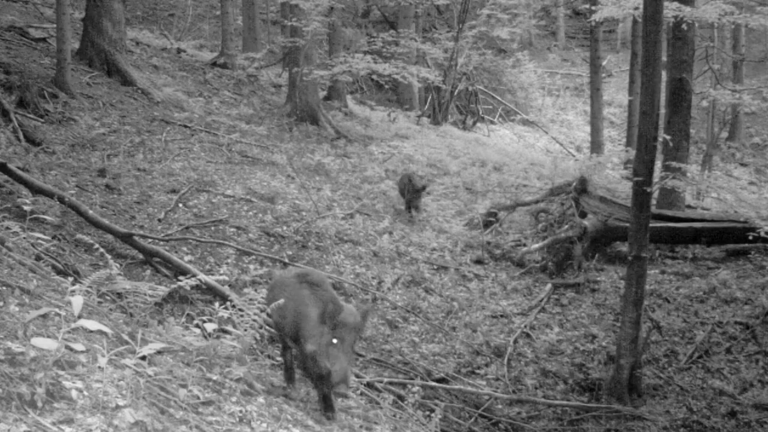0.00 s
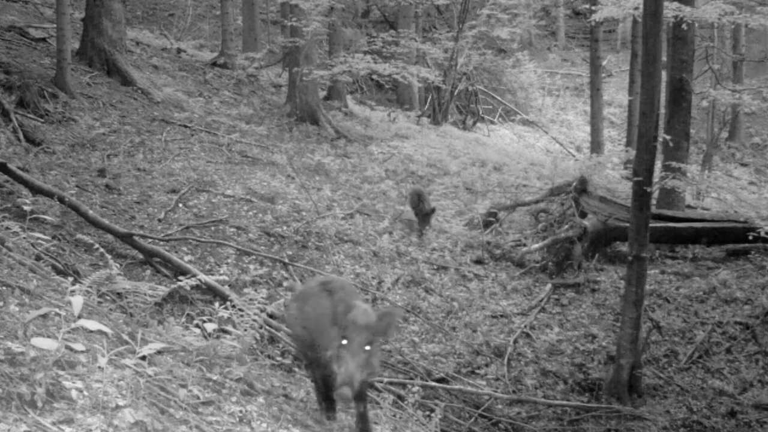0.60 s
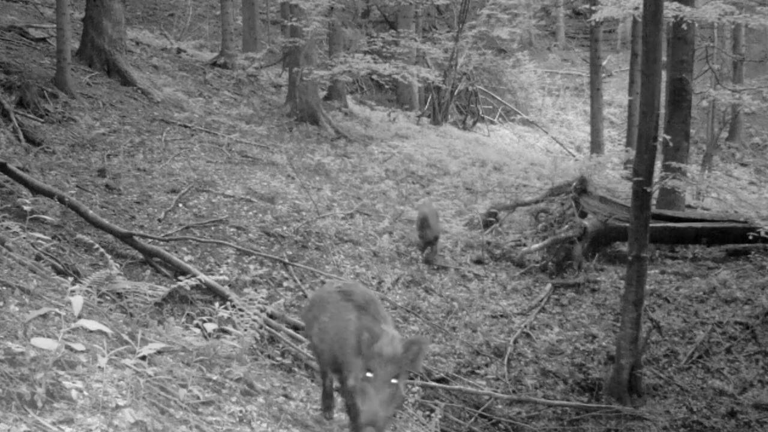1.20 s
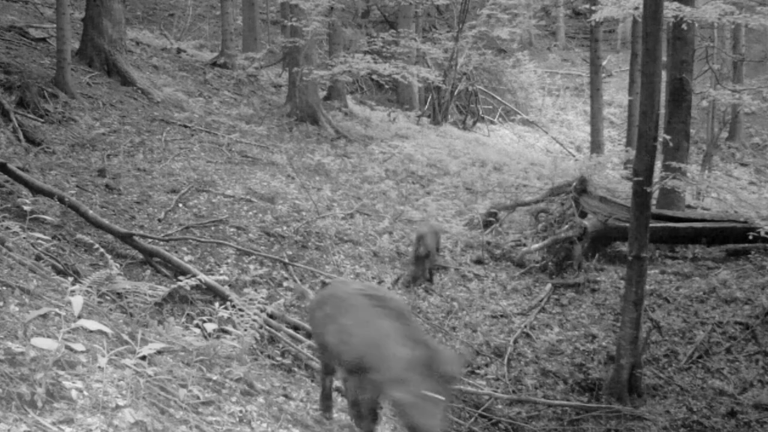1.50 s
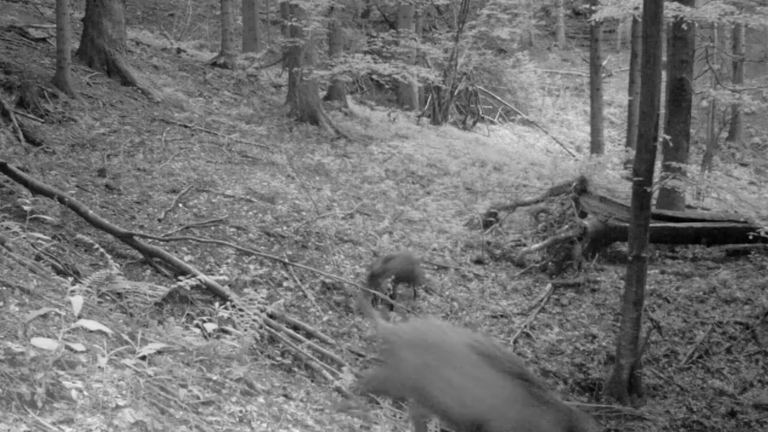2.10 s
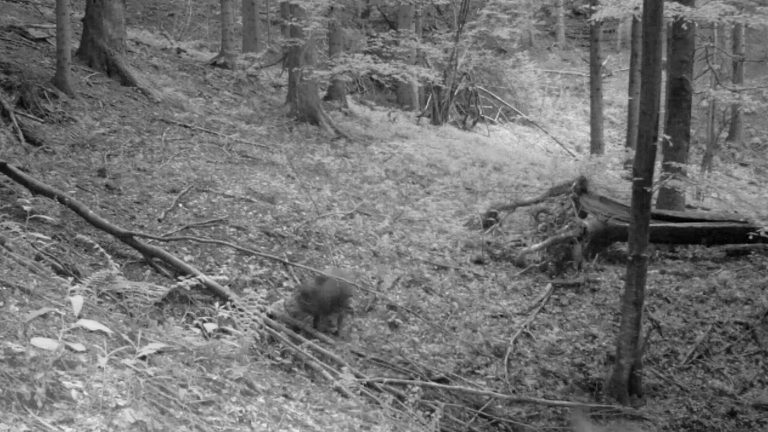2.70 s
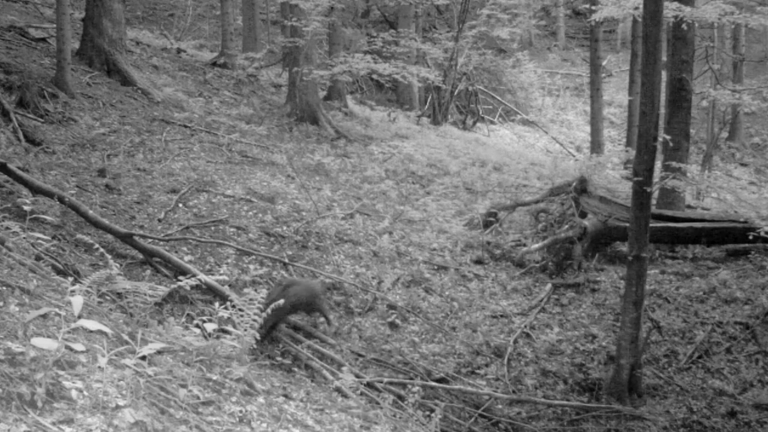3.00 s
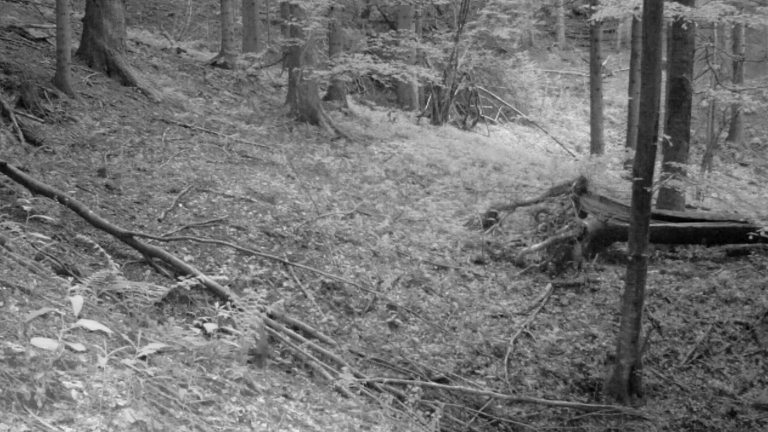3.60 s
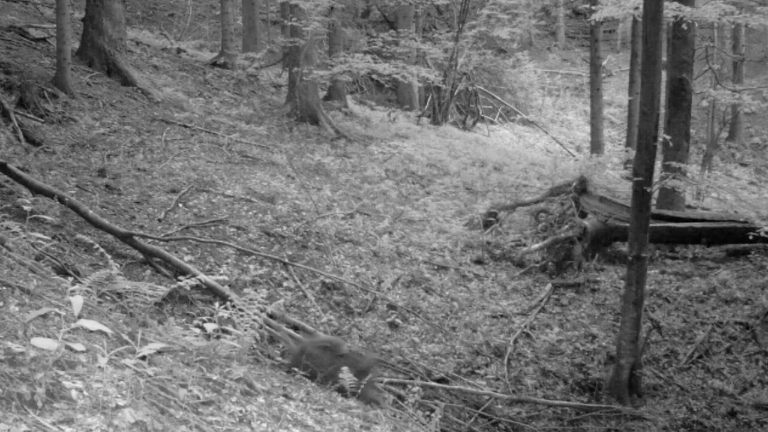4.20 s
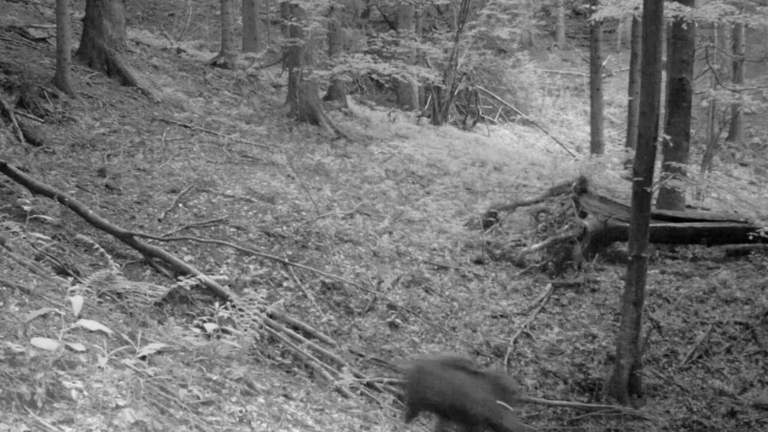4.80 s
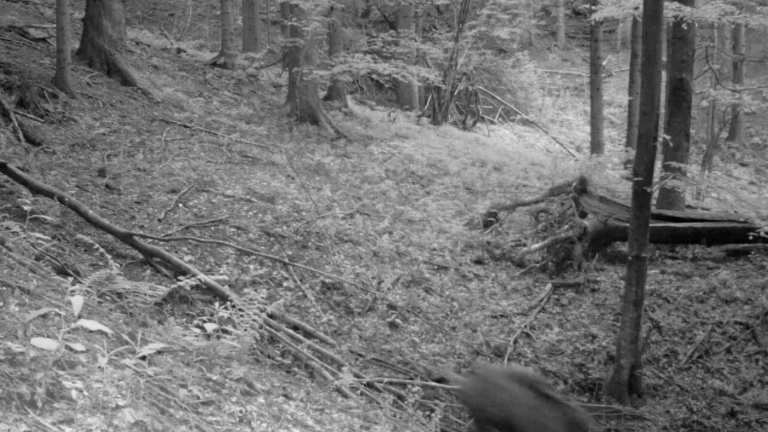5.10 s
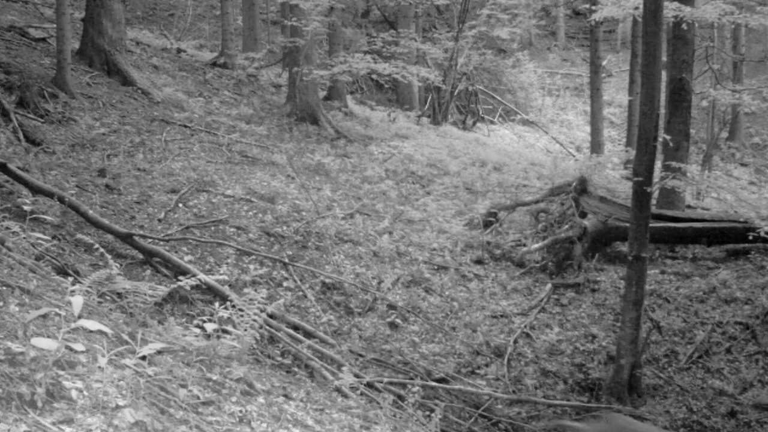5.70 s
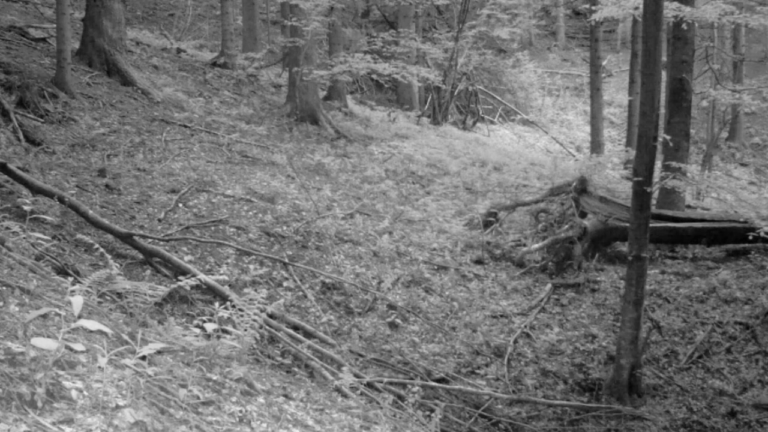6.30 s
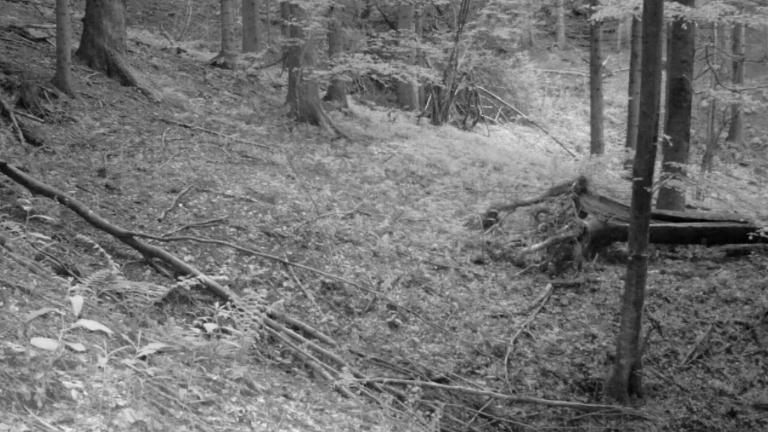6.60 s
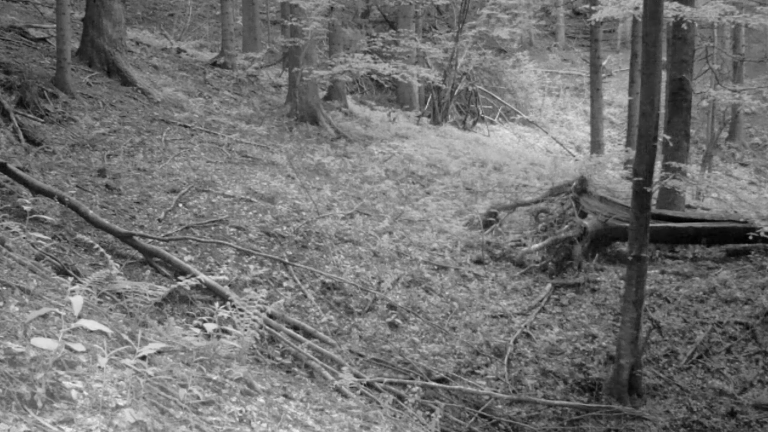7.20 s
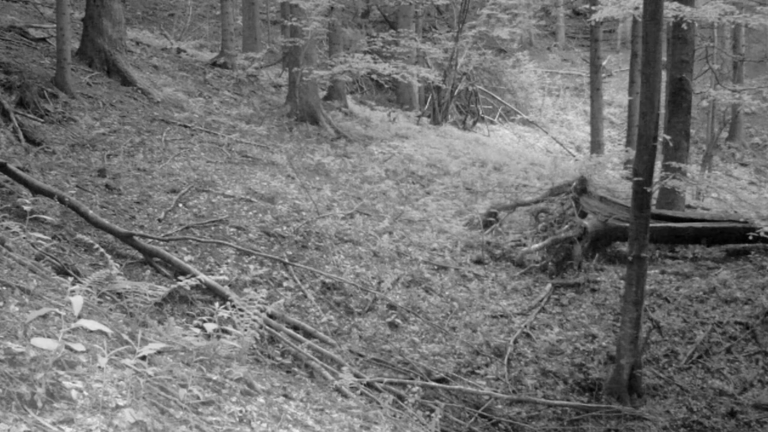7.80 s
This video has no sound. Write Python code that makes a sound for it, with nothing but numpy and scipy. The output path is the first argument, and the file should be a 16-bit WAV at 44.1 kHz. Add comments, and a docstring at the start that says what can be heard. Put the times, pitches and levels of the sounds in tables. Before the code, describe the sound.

Two wild boar walk down a forest slope past a nearby microphone. Their hooves rustle and crunch unevenly through dry leaves, with sharp twig snaps and soft thuds on the soil. Faint birds whistle in the first two seconds, and a brief, soft grunt comes early. The rustling grows louder in the middle, with a short snuffle and one sharper crack, then eases and carries on. A low rumble and faint hum lie underneath.

```python
"""Dry leaves rustle, softly at first, as two wild boar stroll down a forest slope, one after the other.
Each hoof breaks leaves in a shower of tiny fractures; twigs snap and the soil thuds under the load.
The animals grunt softly (pulses exciting a resonance) and snuffle (turbulent breath).
Far off, birds whistle over a low drone. All is heard in mono through the resonant plastic case
of a trail camera beside their path."""
import sys
import numpy as np
from scipy import signal
from scipy.fft import rfft, irfft
from scipy.io import wavfile
from scipy.ndimage import uniform_filter1d, map_coordinates

SR = 44100
rng = np.random.default_rng(int(sys.argv[2]) if len(sys.argv) > 2 else 0)


def int16_out(signal):
    """Quantize to a 16-bit WAV file."""
    q = np.round(np.clip(np.atleast_2d(signal).T, -1, 1) * 32767)
    wavfile.write(sys.argv[1], SR, q.astype(np.int16))


N = 351036
TIME = np.arange(N) / SR

# steady forest rumble and microphone hiss: (frequency [Hz], relative density [dB])
FLOOR_SPECTRUM = [(22, 12), (50, -4.5), (90, -2), (140, -10.5), (220, -18), (410, -25), (900, -27),
                  (1600, -34.5), (2700, -32.5), (4300, -29.5), (7000, -49), (14000, -38), (16000, -46)]
# swelling of the distant drone: (time [s], relative level [dB])
DRONE_CONTOUR = [(0, -44.5), (.5, -36), (1.1, -35.5), (1.9, -43), (2.9, -52), (4.6, -46), (5.3, -39),
                 (5.9, -40), (7.5, -42.5), (7.96, -48)]
# bird whistles: (start [s], end [s], first frequency [Hz], last frequency [Hz], level [dB])
WHISTLES = [(0.02, 0.12, 3500, 3380, -54), (0.47, 0.66, 4200, 4300, -64), (0.69, 0.78, 5650, 5520, -60),
            (0.76, 0.93, 2850, 2720, -56), (0.93, 1.0, 3050, 2900, -57), (1.14, 1.33, 4350, 4250, -62),
            (1.335, 1.385, 2280, 2510, -54), (1.37, 1.52, 2510, 2480, -54.5), (1.5, 1.565, 2460, 2360, -54),
            (1.555, 1.76, 2490, 2450, -57.5), (1.97, 2.12, 3250, 3250, -59), (2.14, 2.21, 2470, 2180, -57)]
# early reflection off trunks, shifting as the animals move: (time [s], delay [ms], gain [ratio])
TRUNK_ECHO = [(0, 0.66, 0.23), (.6, 0.62, 0.086), (1.0, 0.42, 0.078), (2.4, 0.38, 0.12), (3.2, .55, 0.056),
              (3.9, 0.82, 0.048), (4.7, .72, 0.061), (5.3, 0.56, 0.04), (6.5, 0.526, 0.15),
              (7.96, 0.19, 0.067)]
# modes of the plastic case: (frequency [Hz], bandwidth [Hz], gain [dB])
CASE_MODES = [(1480, 450, 2), (1980, 220, -2), (2420, 220, 3.5), (2850, 260, -1), (3300, 250, 1.5),
              (4300, 250, 1), (5300, 200, 1.5), (5580, 160, 1.5), (6100, 200, 2), (7240, 300, 2),
              (8170, 150, 3.5), (9150, 150, 1.5), (10200, 200, 1.5), (11900, 220, 2), (13500, 500, 1.5),
              (14250, 400, 2.5)]

# grunts of the leading boar, breaths, soil yielding: (centre time [s], level [dB], width [s])
GRUNT_SWELLS = [(0.812, -43.5, 0.02), (0.92, -43.5, 0.044), (1.015, -45, 0.023)]
BREATH_SWELLS = [(3.06, -39.5, 0.054)]
THUD_SWELLS = [(0.96, -36.5, 0.13), (1.59, -40, .06), (2.65, -33, 0.052), (2.99, -35, 0.053),
               (3.38, -39, 0.24), (3.60, -41, 0.062), (3.92, -37, 0.04), (4.36, -39.5, 0.1),
               (5.66, -33, 0.042)]
# breath, thuds, soil rumble, damp leaves, dry leaves, leaf edges: (frequency [Hz], relative density [dB])
BREATH_SPECTRUM = [(100, 8), (300, 5), (750, 1), (1200, -5), (1800, -25), (2600, -13), (5000, -11)]
THUD_SPECTRUM = [(25, 10), (60, 1.5), (120, 1), (200, -10), (300, -24.5), (600, -69)]
SOIL_SPECTRUM = [(32, 6), (60, 3), (110, -5), (170, -4.5), (280, -6), (450, -15.5), (800, -20.5),
                 (1600, -55)]
DAMP_SPECTRUM = [(300, -4.5), (600, -3.5), (950, -2), (1400, 1.5), (2000, -2), (3000, -3.5), (5000, -10.5),
                 (9000, -60)]
DRY_SPECTRUM = [(1500, -43), (3000, -7.5), (4200, -3), (5600, 1), (7500, 1.5), (9500, -10.5), (12000, -40),
                (16000, -36)]
EDGE_SPECTRUM = [(5000, -58), (8000, -4.5), (10000, 6.5), (12000, 5), (13200, 4.5), (14400, 8), (15500, -3)]
# hooves striking soil, roots and branches: (time [s], relative peak [dB], frequency [Hz])
HOOF_IMPACTS = [(1.019, -32.5, 900), (1.359, -31, 860), (1.57, -27, 570), (2.531, -31.5, 395),
                (2.628, -28, 162), (2.978, -24, 137), (3.613, -33, 296), (3.73, -33, 280),
                (3.893, -27.5, 450), (3.929, -23.5, 292), (4.359, -36, 330), (5.629, -25.5, 198),
                (6.064, -26, 644), (6.276, -33, 497), (6.873, -31, 314)]
# twigs breaking: (time [s], relative crack [dB], relative knock [dB], frequency [Hz], tear T60 [s])
TWIG_BREAKS = [(0.1292, -39.5, -41.5, 5720, .008), (0.226, -29, -39.5, 6860, .009),
               (0.2507, -33, -46, 4480, .005), (0.3108, -36.5, -38, 5650, .009),
               (0.8731, -34.5, -39.5, 5100, 0.0088), (1.0833, -27.5, -38, 5300, 0.0054),
               (1.448, -30.5, -35.5, 7860, .005), (1.4666, -22, -36, 5500, .0062),
               (1.5725, -28.5, -34.5, 4770, 0.011), (1.7945, -30.5, -31.5, 5800, 0.0085),
               (2.1192, -25.5, -31.5, 5900, .005), (2.229, -31.5, -41, 5500, .003),
               (2.2796, -27.5, -37, 5300, 0.02), (2.4672, -24.5, -31.5, 6400, 0.01),
               (2.507, -23, -48, 7240, 0.011), (2.5879, -23, -41, 5900, 0.0082),
               (2.6033, -27, -42, 6010, 0.015), (2.6537, -23.5, -40, 5760, .008),
               (2.68, -24.5, -34, 6680, .008), (2.7745, -27, -47, 6100, .003),
               (3.1177, -35, -52, 6010, .006), (3.1266, -29, -32.5, 5670, 0.004),
               (3.1814, -15.5, -26, 6540, .028), (3.199, -21.5, -44, 6050, 0.0087),
               (3.5875, -30, -44, 5360, 0.0063), (3.5943, -37, -29.5, 7270, .016),
               (3.8476, -29, -40, 5340, .004), (3.8934, -22, -38, 4300, 0.0072),
               (4.3542, -29.5, -47, 3520, .012), (4.3587, -27.5, -44, 6500, .008),
               (4.5288, -54, -35, 5090, .012), (4.601, -33.5, -39, 5720, .005),
               (4.6426, -28.5, -34, 10200, 0.013), (4.7946, -30, -43, 3100, 0.0058),
               (4.8173, -37, -50, 6400, .003), (5.3343, -37, -45, 4140, .004),
               (5.0074, -29, -37, 7400, .017), (5.3623, -33.5, -47.5, 6470, .02),
               (5.432, -34, -37, 5400, .012), (5.436, -23.5, -32.5, 5400, .008),
               (5.5098, -36, -49, 4420, .013), (5.5507, -37, -48, 5110, .012),
               (5.578, -40.5, -37, 4120, .007), (5.678, -35, -47, 10500, .011),
               (5.9162, -38, -31, 3360, .008), (6.0654, -39, -33.5, 3040, .02),
               (6.1873, -38, -47, 6470, .008), (6.2136, -30, -50, 6940, .014),
               (6.6236, -26, -52, 7800, .006), (6.65, -29, -52, 6610, .004), (6.83, -30, -39, 6600, 0.0075),
               (6.8855, -29.5, -52, 5280, .016), (6.9057, -34, -57, 5550, .003),
               (6.9208, -27.5, -36, 3370, 0.0037), (7.1426, -36, -49, 8950, 0.014),
               (7.187, -29, -31, 2580, 0.0092), (7.256, -40, -50, 3200, 0.0056),
               (7.4447, -36.5, -44, 6470, 0.0088)]
# steps, in relative levels and tilts: (time [s], press duration [s], damp leaves [dB], dry leaves [dB],
# brittle edges [dB], soil [dB], dry tilt [dB/octave], edge tilt [dB/octave])
FOOTFALLS = [(0.116, 0.049, -53, -45.5, -56.0, -65, -5, 0.0),
             (0.212, 0.082, -47.5, -44.5, -51, -54, 2, 0.0), (0.467, 0.031, -60, -47, -57, -48, -8, -1.0),
             (0.786, 0.17, -51.5, -45, -54.5, -51, 1.0, -9),
             (1.049, 0.046, -51.5, -38.5, -49, -49, 0.0, -3.0), (1.405, 0.096, -47, -40, -49, -49, 0, -4.0),
             (1.547, 0.046, -51.5, -44, -48, -44, 1, -2.0), (1.677, 0.12, -47, -40.5, -47, -67, 3, 0.0),
             (1.971, 0.16, -47.5, -40, -48.5, -55, -2, -4.0),
             (2.192, 0.098, -48, -37, -45.5, -60, -3.5, -6), (2.339, 0.053, -47, -38.5, -47, -53, -2.5, -8),
             (2.459, 0.14, -43, -32.5, -43, -60, -1, -5), (2.63, 0.05, -42.5, -35, -42.5, -58, -1, -7.0),
             (2.76, 0.079, -43.5, -32.5, -43.5, -58, -0.5, -5),
             (2.948, 0.041, -47.5, -39, -49.5, -57, -8, 0.0), (3.023, 0.06, -41, -40, -61, -41.5, -6, 1.0),
             (3.178, 0.2, -43.5, -35, -41.5, -47.5, 5.5, -3.0),
             (3.523, 0.17, -43.0, -36.5, -40.5, -45.5, 3, -2),
             (3.784, 0.096, -40.5, -35, -37.5, -44.5, 1.0, 1),
             (4.035, 0.097, -43.5, -38.5, -41, -50, 0.0, 9.0),
             (4.323, 0.1, -45.5, -37.5, -43, -46, -6, 5.0), (4.608, 0.061, -45.5, -36, -45, -52, -2, 3),
             (4.92, 0.039, -51.0, -42.5, -49, -45, -4, 1.0), (4.991, 0.024, -43.5, -39, -43, -58, 0.0, -3),
             (5.237, 0.059, -49.5, -46.5, -51, -56, 1, 2.0), (5.335, 0.14, -47.5, -47.5, -47, -56, 3, 0.0),
             (5.559, 0.053, -53, -53, -51, -43, 1, 3.0), (5.654, 0.021, -55.5, -45, -53, -56, 0.0, -3.0),
             (5.808, 0.1, -45, -35, -42.5, -48.5, -0.5, -8), (6.043, 0.02, -43.5, -39.5, -46, -46, 3, 8),
             (6.173, 0.082, -46.5, -33.5, -39.5, -48, -3, 0), (6.252, 0.15, -43.5, -31.5, -39, -49, -1, -1),
             (6.517, 0.063, -42.5, -35, -42, -61, 4, 6.0), (6.566, 0.13, -53, -34.5, -41, -62, -5, -4),
             (6.801, 0.094, -48, -39.5, -46, -51.5, -5, 4.0),
             (7.121, 0.059, -51, -45, -50.0, -49.5, -7, 6.0),
             (7.349, 0.094, -49.5, -40.5, -46, -48, -2.5, -2),
             (7.631, 0.085, -48, -38, -43.5, -64, -0.5, 1.0),
             (7.902, 0.021, -68, -50.5, -47.0, -60.0, 4, 0.0)]
# legs and snouts stirring the leaves between steps: (time [s], relative level [dB])
STIR_CONTOUR = [(0, -53), (.7, -54.5), (1.3, -49), (2.2, -51.5), (3.3, -43.5), (4.2, -44), (5.1, -50),
                (5.75, -50), (6.5, -52), (7.05, -50.5), (7.96, -52.5)]
# response of damp leaves, dry leaves, edges and soil to stirring: (relative level [dB], slope [dB/dB])
STIR_RESPONSE = [(-52.5, 0.57), (-44.5, 1.0), (-51.5, 0.91), (-51.5, 0.63)]


def from_db(db):
    """Amplitude ratio: a factor of ten for every 20 dB."""
    return 10 ** (np.asarray(db) / 20)


def unit_rms(x):
    """Normalisation to unit mean power."""
    return x / np.sqrt(np.mean(x ** 2) + 1e-20)


def in_time(rows):
    """Linear interpolation of each column to every sample."""
    times, *columns = np.transpose(rows)
    return [np.interp(TIME, times, column) for column in columns]


def at_hz(spectrum, hz):
    """Interpolation of a spectrum on a logarithmic frequency axis."""
    frequencies, db = np.transpose(spectrum)
    return np.interp(np.log(hz), np.log(frequencies), db)


def band(x, low_hz, high_hz):
    """Causal Butterworth band-pass filtering."""
    sos = signal.butter(2, [low_hz, min(high_hz, .48 * SR)], "band", fs=SR, output="sos")
    return signal.sosfilt(sos, x + 1e-18)


def resonate(x, hz, width_hz):
    """Forced response of a damped oscillator with unit peak gain."""
    radius = np.exp(-np.pi * width_hz / SR)
    feedback = [1, -2 * radius * np.cos(2 * np.pi * hz / SR), radius ** 2]
    return signal.lfilter(np.array([1, 0, -1]) * (1 - radius ** 2) / 2, feedback, x)


def drift(per_s):
    """Smooth random modulation of unit rms, interpolated through per_s values a second."""
    knots = rng.standard_normal(2 ** 14)
    return unit_rms(map_coordinates(knots, [TIME * per_s], order=2, mode="wrap"))


def noise(spectrum):
    """Spectral shaping of white noise, to unit rms."""
    hz = np.maximum(np.fft.rfftfreq(N, 1 / SR), 1)
    roll_off = np.minimum(hz / spectrum[0][0], 1) ** 2 * np.minimum(spectrum[-1][0] / hz, 1) ** 2
    return unit_rms(irfft(rfft(rng.standard_normal(N)) * from_db(at_hz(spectrum, hz)) * roll_off, N))


def swells(rows):
    """A sum of Gaussian amplitude envelopes."""
    return sum(from_db(db) * np.exp(-2 * ((TIME - centre) / width) ** 2) for centre, db, width in rows)


def add(out, start_s, sound):
    """Linear superposition of a sound at a given time."""
    i = min(max(round(start_s * SR), 0), N)
    out[i:i + len(sound)] += sound[:N - i]


def noise_floor(level_db):
    """Stationary broadband noise: forest rumble and microphone hiss."""
    return from_db(level_db) * noise(FLOOR_SPECTRUM)


def drone(hz, sag_hz_per_s, waver_hz, flutter_db):
    """Two harmonics share one slowly sinking, wavering pitch; the octave swells less than the first."""
    contour_db, = in_time(DRONE_CONTOUR)
    octave_db = -45.5 + .3 * (contour_db + 37)
    phase = 2 * np.pi * np.cumsum(hz - sag_hz_per_s * TIME + waver_hz * drift(14)) / SR
    fundamental = from_db(contour_db + 2.5 + flutter_db * drift(24)) * np.sin(phase)
    return fundamental + from_db(octave_db + flutter_db * drift(24)) * np.sin(2 * phase)


def birds(quaver):
    """Frequency modulation: each whistle is a gliding pure tone with a slight random quaver."""
    out, wobble = np.zeros(N), 1 + quaver * drift(90)
    for start, end, first_hz, last_hz, db in WHISTLES:
        i, n = round(start * SR), round((end - start) * SR)
        hz = np.linspace(first_hz, last_hz, n) * wobble[i:i + n]
        tone = np.sin(2 * np.pi * np.cumsum(hz) / SR)
        add(out, start, from_db(db) * signal.windows.tukey(n, .4) * tone)
    return out


def reverberation(x, t60, high_hz):
    """Scattering by trunks and ground leaves a thin, dull tail that decays exponentially."""
    t = TIME[:SR]
    echoes = rng.standard_normal(SR) * (rng.random(SR) < .1) * from_db(-60 * t / t60) * (t > .003)
    echoes = band(echoes, 300, high_hz)
    return signal.fftconvolve(x, echoes / np.linalg.norm(echoes))[:N]


def with_reflection(x):
    """Interference of the direct sound with a shifting reflection: a comb filter hollows the rustle."""
    delay_ms, gain = in_time(TRUNK_ECHO)
    return x + gain * map_coordinates(x, [np.arange(N) - delay_ms * SR / 1000], order=3)


def snuffle():
    """Turbulence: a snout blows a puff of noise into the leaves."""
    return swells(BREATH_SWELLS) * noise(BREATH_SPECTRUM)


def grunts(pulse_hz, formant_hz, width_hz, jitter):
    """Source and filter: slow, uneven pulses excite one low resonance of a closed snout."""
    cycles = np.cumsum(pulse_hz * (1 + jitter * drift(60))) / SR
    pulses = np.diff(np.floor(cycles), prepend=0) * from_db(2.1 * drift(80))
    voice = resonate(resonate(pulses, formant_hz, width_hz), formant_hz, width_hz)
    return swells(GRUNT_SWELLS) * unit_rms(voice)


def ground(soil_db):
    """Forced vibration: the soil rumbles under the animals' weight and thuds at heavy steps."""
    rumble = from_db(soil_db + 4.5) * noise(SOIL_SPECTRUM)
    return rumble + swells(THUD_SWELLS) * noise(THUD_SPECTRUM)


def hooves(gain_db, t60_cycles, grit):
    """Impact excites a heavily damped oscillation, with a little noise from grit under the hoof."""
    out, t = np.zeros(N), TIME[:SR // 8]
    for start, db, hz in HOOF_IMPACTS:
        grains = unit_rms(band(rng.standard_normal(len(t)), hz / 2, hz * 2))
        envelope = from_db(-60 * t * hz / t60_cycles) * (1 - np.exp(-2 * t * hz))
        blow = (np.sin(2 * np.pi * hz * t) + grit * grains) * envelope
        add(out, start, from_db(db + gain_db) * blow / np.abs(blow).max())
    return out


def twigs(crack_gain_db, knock_gain_db, splinter_db, splinter_t60, knock_t60, width_hz):
    """Brittle fracture: fibres snap and tear, splinters follow, and the stick gives a woody knock."""
    out, t = np.zeros(N), TIME[:SR // 8]
    impulse, onset = t == 0, t < .005
    for start, crack_db, knock_db, hz, tear_t60 in TWIG_BREAKS:
        tear, wood = rng.choice([-1, 1], (2, len(t)))
        decay = from_db(-60 * t / tear_t60) + from_db(splinter_db - 60 * t / splinter_t60)
        burst = 2.2 * impulse + tear * decay
        low_cut = signal.butter(2, .36 * hz, "high", fs=SR, output="sos")
        crack = signal.sosfilt(low_cut, resonate(burst, hz, width_hz)) + .1 * band(burst, 3700, 14000)
        knock = band(impulse + .098 * wood * from_db(-60 * t / knock_t60), 1000, 2000)
        add(out, start, from_db(crack_db + crack_gain_db) * crack / crack[onset].std())
        add(out, start, from_db(knock_db + knock_gain_db) * knock / knock[onset].std())
    return out


def treading(attack_s, sag_db_per_s, settle_t60):
    """Incoherent sources add in power: steps and stirring give four layer levels and two tilts."""
    stir_db, = in_time(STIR_CONTOUR)
    power = np.array([from_db(db + slope * (stir_db + 45)) ** 2 for db, slope in STIR_RESPONSE])
    weighted_tilt, t = np.zeros((2, N)), TIME[:SR]
    for start, press_s, *layer_db, dry_tilt, edge_tilt in FOOTFALLS:
        # the weight comes on, eases, and the leaves settle
        fall_db = sag_db_per_s * t + 60 * np.maximum(t - press_s, 0) / settle_t60
        envelope = np.minimum(t / attack_s, 1) * from_db(-fall_db)
        step_power = np.outer(from_db(layer_db), envelope) ** 2
        for layer, part in zip(power, step_power):
            add(layer, start, part)
        add(weighted_tilt[0], start, dry_tilt * step_power[1])
        add(weighted_tilt[1], start, edge_tilt * step_power[2])
    return 10 * np.log10(power), weighted_tilt / power[1:3]


def fractures(per_s, spread_db, clump_db):
    """A Poisson process of tiny leaf breaks, many small and few large, held at even running power."""
    occurs = rng.random(N) < per_s / SR
    size_db = spread_db * rng.exponential(1, N) + clump_db * drift(170)
    breaks = occurs * from_db(np.minimum(size_db, 16)) * rng.choice([-1, 1], N)
    running_power = np.abs(uniform_filter1d(breaks ** 2, size=SR // 25))
    return breaks / np.sqrt(running_power + 1e-6)


def buckling(per_s, jump_db, t60):
    """Elastic instability: whole leaves give way, each abruptly lifting a gain that then sinks back."""
    jumps = (rng.random(N) < per_s / SR) * from_db(jump_db * rng.random(N) ** 2) ** 2
    retention = from_db(-120 / (t60 * SR))
    power = 1 + signal.lfilter([1], [1, -retention], jumps + 1e-18)
    return unit_rms(np.sqrt(power))


def leaves(breaks, spectrum, tilt, pivot_hz, colour_db, friction):
    """Fracture and friction: each break has its own spectral colour, and sliding leaves hiss between."""
    out, band_edges = 0, np.geomspace(250, 17000, 21)
    sliding = rng.standard_normal((2, N))
    for k, (low, high) in enumerate(zip(band_edges, band_edges[1:])):
        if high > spectrum[0][0]:
            hz = np.sqrt(low * high)
            crackle = unit_rms(breaks * from_db(colour_db * np.tanh(drift(400))))
            gain = from_db(at_hz(spectrum, hz) + tilt * np.clip(np.log2(hz / pivot_hz), -1, .5))
            out = out + gain * band(crackle + friction * sliding[k % 2], low, high)
    return unit_rms(out)


def leaf_litter(damp_db, dry_db, edge_db, dry_tilt, edge_tilt):
    """Acoustic emission under load: the harder a hoof presses, the more leaves break each second."""
    breaks = fractures(per_s=3000 * from_db(.5 * (dry_db + 45)), spread_db=5, clump_db=-.1)
    damp = leaves(breaks, DAMP_SPECTRUM, tilt=.33, pivot_hz=1780, colour_db=15, friction=.74)
    dry = leaves(breaks, DRY_SPECTRUM, dry_tilt - .8, pivot_hz=5400, colour_db=20, friction=1)
    edges = leaves(breaks, EDGE_SPECTRUM, edge_tilt, pivot_hz=11800, colour_db=7.5, friction=.8)
    rustle = from_db(damp_db + .5) * damp + from_db(dry_db - 1.5) * dry + from_db(edge_db + .9) * edges
    return rustle * buckling(per_s=130, jump_db=9.5, t60=.015)


def scene():
    """Superposition of the nearby boar with the distant birds and drone."""
    (*leaf_db, soil_db), tilts = treading(attack_s=.024, sag_db_per_s=14, settle_t60=.55)
    snaps = twigs(crack_gain_db=-2.5, knock_gain_db=-4.5, splinter_db=-13,
                  splinter_t60=.066, knock_t60=.031, width_hz=1760)
    steps = hooves(gain_db=-.5, t60_cycles=3, grit=.38) + ground(soil_db)
    boar = with_reflection(leaf_litter(*leaf_db, *tilts) + snaps) + snuffle()
    boar += grunts(pulse_hz=75.1, formant_hz=275, width_hz=150, jitter=.25)
    song = birds(quaver=.007)
    far = song + from_db(-7) * reverberation(song, t60=.45, high_hz=7000)
    hum = drone(hz=62.15, sag_hz_per_s=.12, waver_hz=.797, flutter_db=.96)
    near = boar + from_db(-20) * reverberation(boar, t60=.44, high_hz=9100) + steps
    return np.tile(near + far + hum, (2, 1))


def record(dry):
    """Case resonances colour the sound; forest rumble and microphone hiss join; the band is limited."""
    ringing = sum((from_db(db) - 1) * resonate(dry[0], hz, width) for hz, width, db in CASE_MODES)
    mono = dry[0] + ringing + noise_floor(level_db=-40)
    low_cut = signal.butter(2, 31, "high", fs=SR, output="sos")
    high_cut = signal.ellip(10, .1, 80, 15500, fs=SR, output="sos")
    return np.tile(signal.sosfilt(high_cut, signal.sosfilt(low_cut, mono)), (2, 1))


dry = scene()
out = record(dry)
int16_out(out)
```